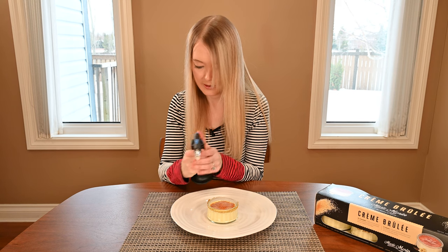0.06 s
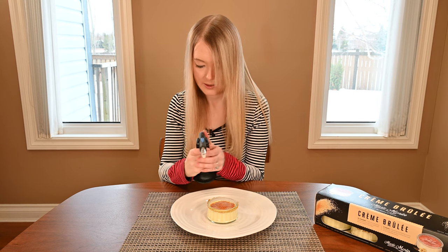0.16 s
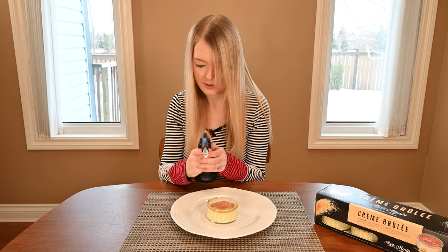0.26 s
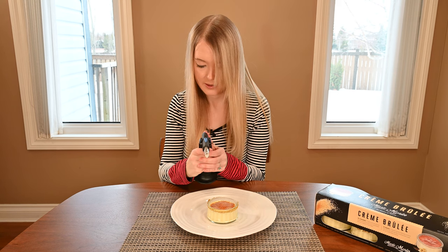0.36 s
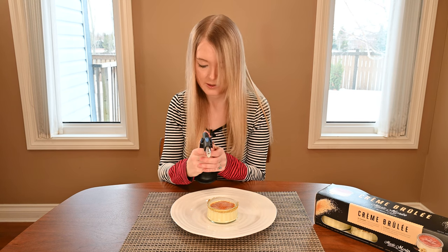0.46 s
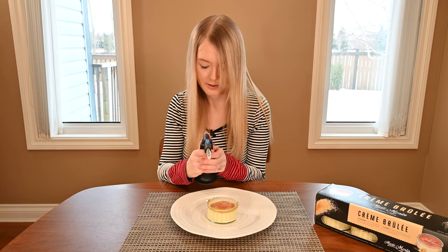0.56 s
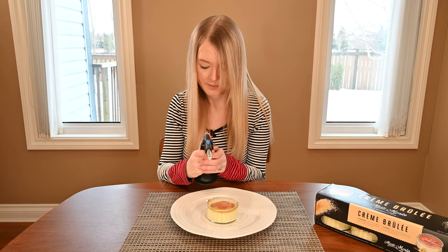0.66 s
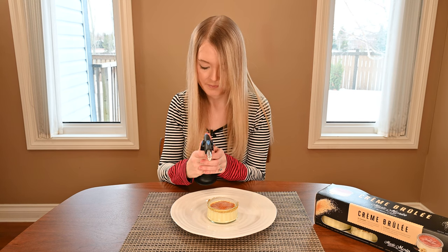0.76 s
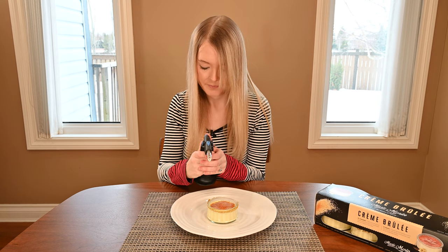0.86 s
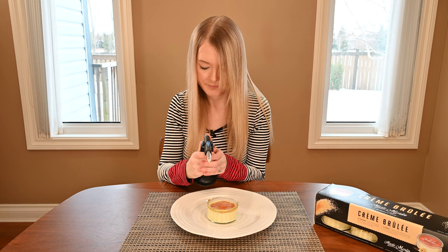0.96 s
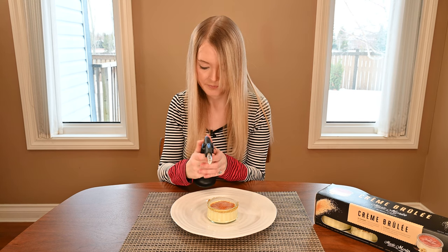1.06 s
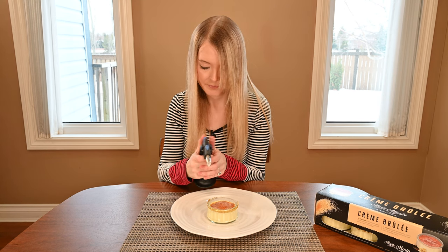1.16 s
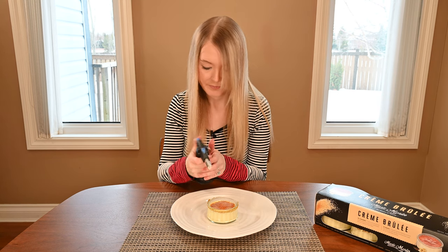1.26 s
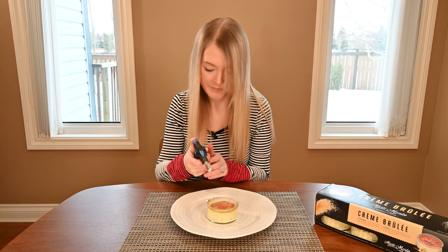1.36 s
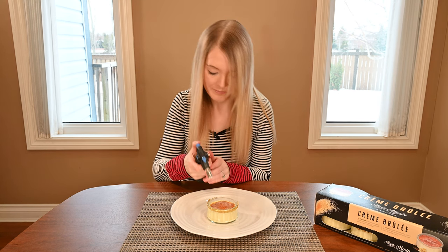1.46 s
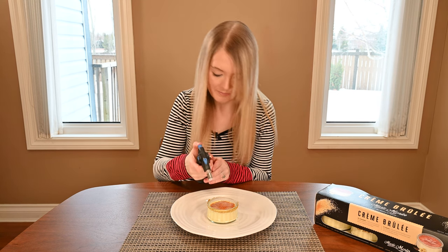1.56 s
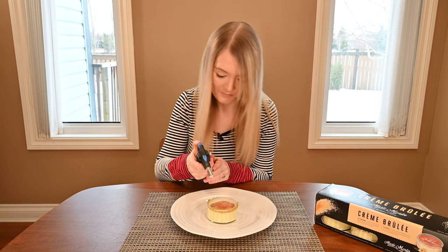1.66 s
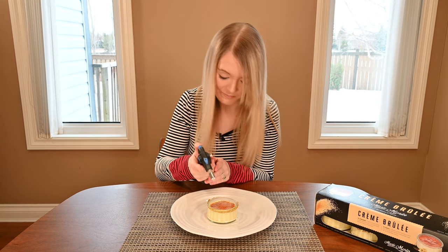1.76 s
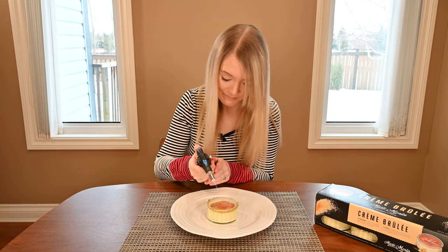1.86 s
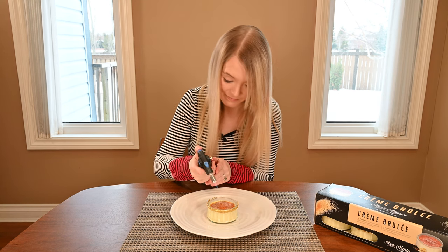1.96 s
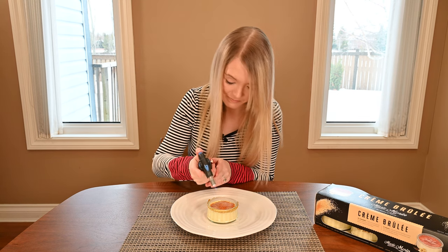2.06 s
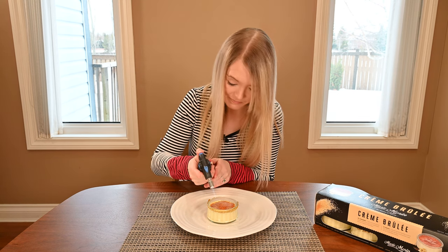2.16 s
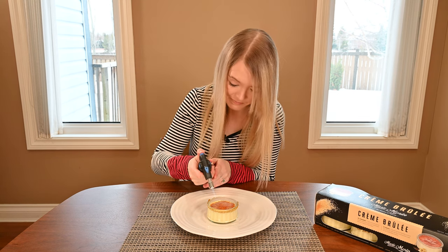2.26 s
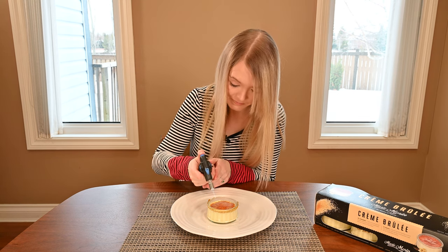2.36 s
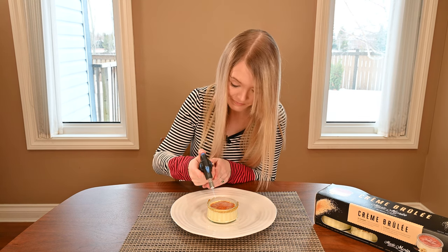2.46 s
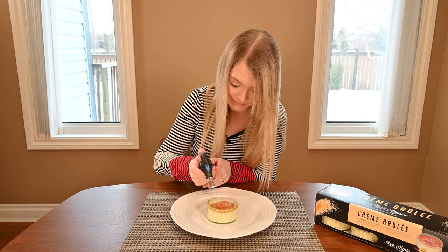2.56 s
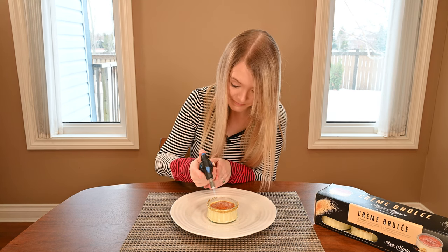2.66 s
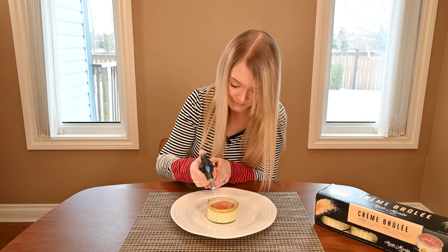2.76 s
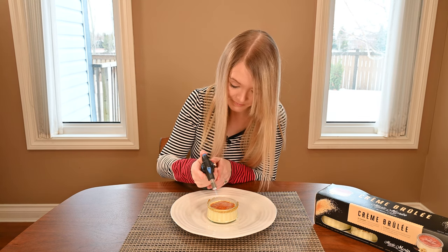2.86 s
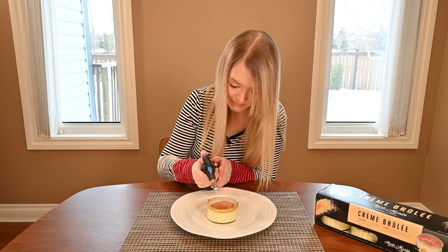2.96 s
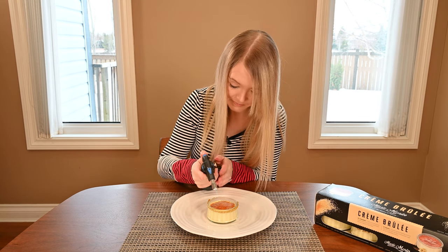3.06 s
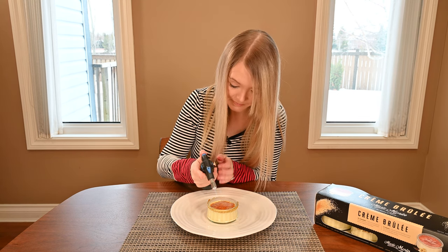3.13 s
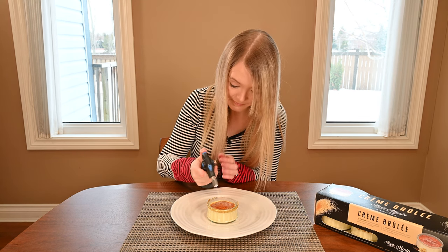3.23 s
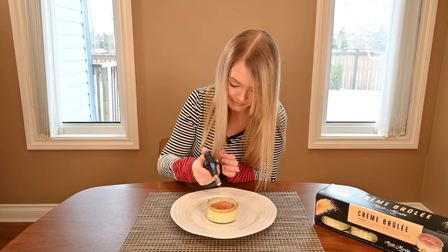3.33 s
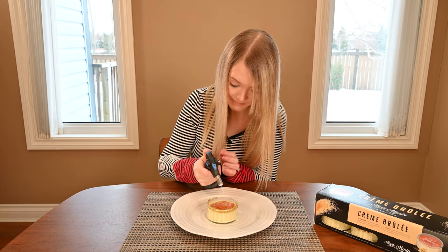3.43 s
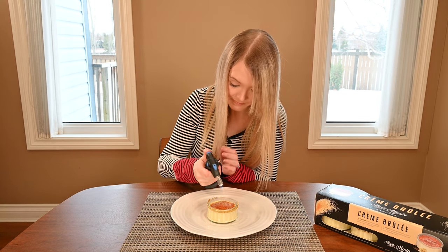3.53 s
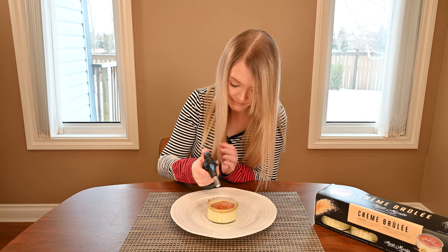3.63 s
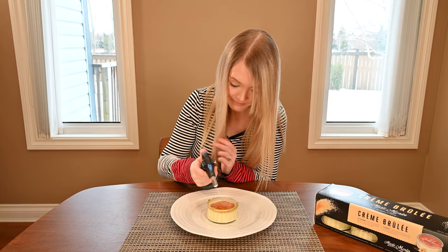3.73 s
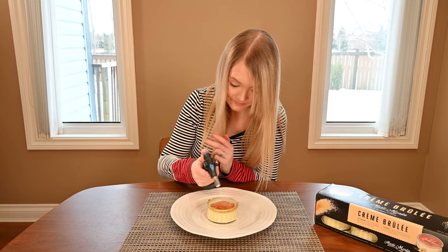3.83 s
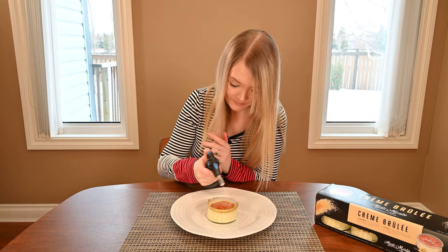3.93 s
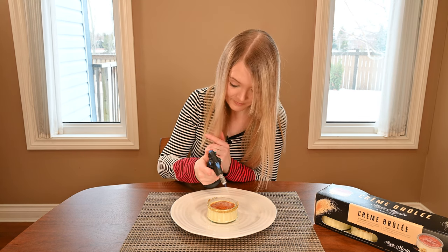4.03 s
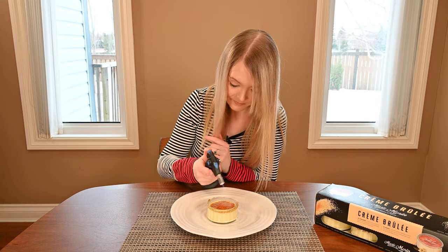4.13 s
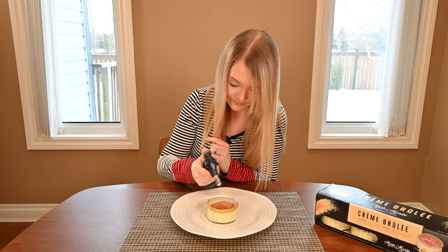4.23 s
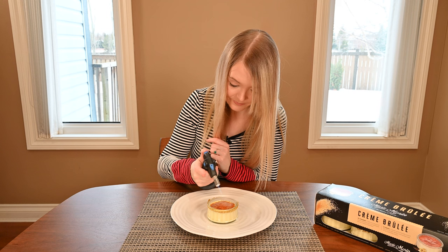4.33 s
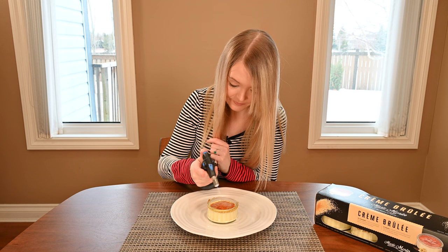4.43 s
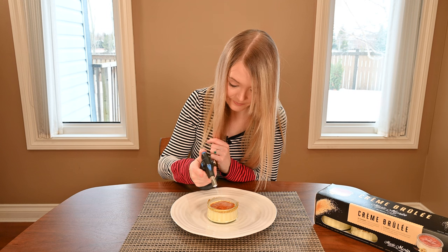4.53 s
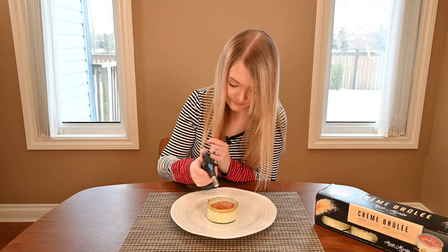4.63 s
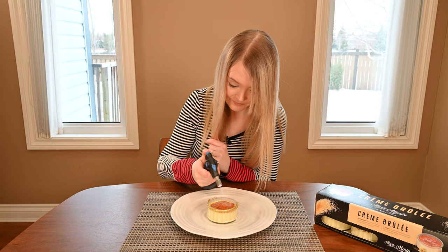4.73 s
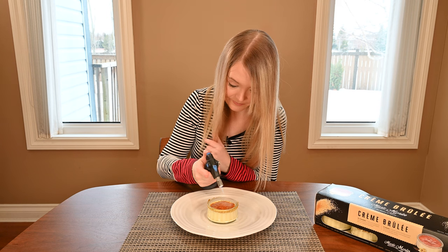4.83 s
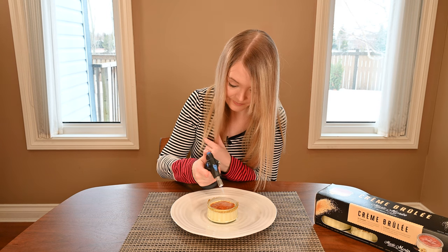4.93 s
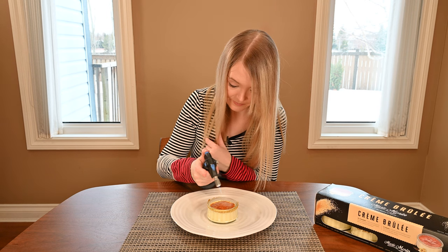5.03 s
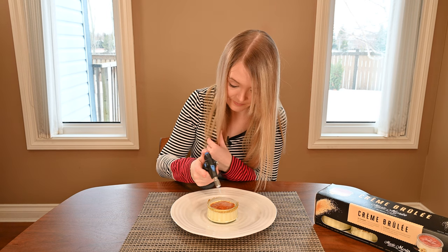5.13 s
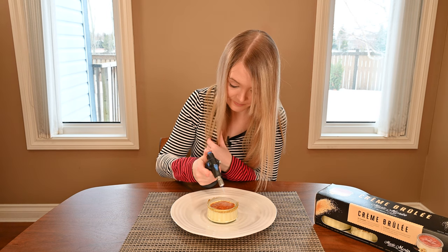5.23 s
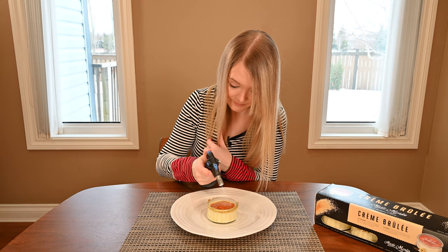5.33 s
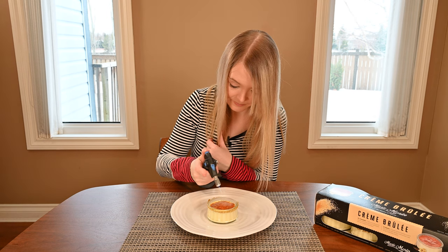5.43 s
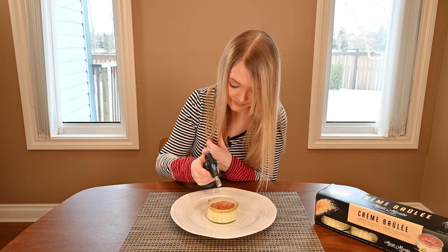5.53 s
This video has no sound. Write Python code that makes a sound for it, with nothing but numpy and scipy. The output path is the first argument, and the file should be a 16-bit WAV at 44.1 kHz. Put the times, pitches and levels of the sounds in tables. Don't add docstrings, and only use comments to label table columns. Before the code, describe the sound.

Soft sleeve and finger handling in a quiet room, then two sharp igniter snaps, a small pop, and a steady hissing gas torch with late sugar sizzle.

```python
import sys
import numpy as np
from scipy import signal
from scipy.io import wavfile
from scipy.ndimage import uniform_filter1d

SR = 44100
rng = np.random.default_rng(int(sys.argv[2]) if len(sys.argv) > 2 else 0)


def invert_db(x):
    u = np.asarray(x, float) / 20
    return 10 ** u


def wav_out(sig):
    wavfile.write(sys.argv[1], SR, np.round(np.clip(np.atleast_2d(sig).T, -1, 1) * 32767).astype(np.int16))


N = 246737
TIME = np.arange(N) / SR
HZ = np.fft.rfftfreq(1024, 1 / SR)[:, None]
FRAMES = np.arange(N // 256 + 5) * 256 / SR
LIGHT_S = 1.8838

# frequency in Hz, level in dB per Hz.
ROOM_HISS = [(20, -23.5), (50, -17.5), (120, -3.5), (300, -2.5), (600, -11), (1200, -16), (2500, -23),
             (6000, -24), (12000, -28), (13500, -31), (16000, -35)]
# frequency in Hz, level in dB.
APPLIANCE_TONES = [(118.4, -78.5), (242.2, -82), (387.6, -85.5), (511.4, -81.5), (597.5, -90)]
# middle in seconds, length in seconds, level in dB.
SLEEVE_RUBS = [
    (-.05, 0.2, -75),
    (.25, 0.61, -70.5),
    (.52, 0.12, -73.5),
    (1.1, 0.23, -77),
    (1.35, 0.38, -67),
    (1.6, .1, -74.5),
]
# frequency in Hz, level in dB.
CLOTH = [(250, -1), (800, 0.5), (1500, 0), (2600, -8.0), (6000, -18)]
# start in seconds, length in seconds, centre in Hz, width in Hz, level in dB.
FINGER_SLIPS = [(.14, .157, 1900, 700, -79), (.33, .06, 8500, 900, -88), (.316, .071, 2200, 2200, -79.5),
                (.35, .04, 1800, 300, -78), (1.03, .03, 6000, 8000, -82), (1.085, .1, 5000, 2200, -80),
                (1.21, .06, 1450, 450, -73), (1.2, .065, 5000, 5000, -76), (1.28, .07, 3520, 2500, -76),
                (1.34, .035, 7000, 8000, -74), (1.395, .095, 8750, 1000, -82),
                (1.385, .115, 6500, 8000, -74), (1.4, .025, 13500, 3000, -81),
                (1.575, .068, 1390, 500, -74), (1.574, .056, 3600, 2800, -78)]
# start in seconds, peak in dB, rise in ms, time to fall by 60 dB in seconds.
CLICKS = [(0.1245, -39.5, 3.9, 0.032), (.508, -60, .5, .008), (0.6476, -61, .5, .01), (.687, -64, .5, .008),
          (1.582, -61.5, .5, 0.037), (1.6746, -57, .5, .01), (1.7084, -27, .4, 0.0095),
          (1.7202, -40.5, .8, .015), (1.8286, -26, .8, 0.0043), (1.8394, -8.5, 0.87, 0.0063),
          (1.8726, -2.6, 0.18, 0.0115)]
STRUCK_PART = [0, 4, 5, 4, 5, 4, 1, 0, 3, 2, 3]
# frequency in Hz, width in Hz, level in dB.
PARTS = [
    [(1650, 390, 4.5), (3020, 240, 1.5), (4210, 390, -1), (4850, 220, 0), (6570, 900, -11), (8800, 470, -7),
     (12100, 2500, -18)],
    [(740, 540, -6.5), (1460, 500, -1), (2130, 150, -2), (3000, 510, 0.5), (3970, 1000, 3),
     (5870, 550, 1.5), (9500, 970, -4.5), (11600, 1800, -4.5), (14500, 1800, -12)],
    [(1890, 180, -21.5), (3430, 660, -11.5), (4840, 1330, -4.5), (5900, 1100, -7.5), (6800, 1300, -18),
     (8580, 770, -11.5), (12100, 1200, -18), (15200, 1100, -16)],
    [(1350, 180, -5), (2430, 510, -8.5), (3750, 510, -1), (5630, 450, -1.5), (8830, 600, 0),
     (10900, 1330, 0.5), (13040, 790, 0), (14730, 1100, -2.5)],
    [(4300, 2000, 13), (6300, 1200, 3), (9000, 1500, -13)],
    [(1500, 600, -5.5), (2720, 740, -2), (4500, 1200, -14), (7000, 2200, -9)],
]
PART_LOWEST_HZ = [650, 450, 1180, 320, 2500, 1210]
# frequency in Hz, level in dB, time to fall by 60 dB in seconds.
METAL_RING = [
    (1330, -15.5, .018),
    (3300, -19.5, .03),
]
# middle in seconds, length in seconds, level in dB.
ARM_SHIFTS = [
    (.32, 0.24, -69),
    (1.42, .15, -78),
    (4.9, 0.41, -63),
    (5.2, 0.35, -66),
]
# frequency in Hz, level in dB.
COLD_RUSH = [(300, -1), (700, 7.5), (1400, 7), (2500, -16), (5000, -29)]
# frequency in Hz, width in Hz, level in dB.
TUBE_MODES = [(1940, 150, -13.5), (2720, 370, -20.5), (4210, 470, -6), (4673, 584, 1), (6220, 1600, -5),
              (7890, 1130, 0), (9100, 3600, -10.5), (11000, 1950, 0.5), (13370, 1900, 1.5),
              (15170, 1400, -2.5)]
# time in seconds, level in dB.
GAS_FLOW = [
    (1.75, -60.5),
    (1.81, -56),
    (1.83, -57.5),
    (2.12, -57),
    (2.47, -57),
    (4.1, -58),
    (4.9, -57.5),
    (5.03, -54),
    (5.14, -55),
    (5.59, -54),
]
# middle in seconds, length in seconds, lift in dB.
TUBE_SWINGS = [
    (2.47, .2, 5),
    (4.056, 0.27, 1.5),
    (4.93, 0.19, 4.5),
    (5.174, 0.21, 4),
]
# time in seconds, frequency in Hz, depth from 0 to 1.
PLATE_SHADOW = [(1.9, 11000, .25), (2.1, 11200, .4), (2.27, 13400, .4), (2.45, 14500, .4),
                (3.1, 14300, .38), (3.8, 15300, .45), (4.1, 13100, .25), (4.5, 12800, .3), (5.6, 14300, .2)]
HAND_TREMOR = [
    (1.7, .012),
    (3.1, .009),
    (5.3, .006),
]
# frequency in Hz, level in dB per Hz.
FLAME_ROAR = [(40, -38), (70, -48), (118, -15.5), (210, -7.5), (300, -2.5), (450, -3.5), (750, -3),
              (900, -6), (1400, -8.5), (1660, -19.5), (2200, -24.5), (3500, -30.5), (6000, -47)]
# frequency in Hz, width in Hz, lift in dB.
ROOM_MODES = [(246.5, 62, 0), (429.3, 15, 5), (568, 33, 7), (700, 32, 4), (715, 20, 6)]
# middle in seconds, length in seconds, lift in dB.
FLAME_LICKS = [
    (2.304, 0.26, 1),
    (3.29, 0.35, 0.3),
    (5.282, 0.052, 4),
    (5.6, .03, 3),
]
# start in seconds, peak in dB.
SUGAR_SPITS = [(4.2098, -48), (4.6194, -44), (4.636, -47.5), (4.6544, -57), (4.6794, -46), (4.6916, -50),
               (4.7561, -39), (4.791, -43), (4.8094, -54), (4.9643, -45), (4.9757, -41), (5.008, -43),
               (5.0344, -49), (5.2644, -46), (5.309, -50)]
# start in seconds, peak in dB, centre in Hz, time to fall by 60 dB in seconds.
SYRUP_BUBBLES = [
    (4.896, -47, 2000, 0.056),
    (4.915, -54, 2100, .04),
    (5.02, -46, 3000, 0.031),
    (5.265, -54, 2800, .03),
]
# middle in seconds, length in seconds, level in dB.
SIZZLE_SPELLS = [
    (4.22, .06, -68),
    (4.65, 0.17, -60),
    (4.79, 0.22, -63),
    (4.98, 0.25, -67),
    (5.28, .15, -72),
    (5.55, .2, -74),
]
# delay in ms, level in dB.
ECHOES = [
    (7.8, -23),
    (9.3, -25.5),
    (12.6, -27),
    (19.3, -21.5),
    (26, -25.5),
]
# frequency in Hz, time to fall by 60 dB in seconds.
ROOM_DECAY = [(125, 0.51), (500, 0.55), (2000, 0.75), (6000, 0.45), (15000, 0.34)]
# frequency in Hz, level in dB against the sound.
TRACK_DIFFERENCE = [(60, -48), (1200, -57), (2400, -33.5), (4400, -20.5), (8000, -18), (15000, -8.5)]


def evened(x):
    return x / np.sqrt(np.mean(x ** 2) + 1e-20)


def read(points, hz):
    f, value = np.transpose(points)
    return np.interp(np.log(hz + 1), np.log(f + 1), value)


def add(mix, s, sound):
    part = mix[round(s * SR):][:len(sound)]
    part += sound[:len(part)]


def resonate(x, hz, width):
    pole = np.exp((2j * np.pi * hz - np.pi * width) / SR)
    return 2 * signal.lfilter([1 - abs(pole)], [1, -pole], x).real


def peak(hz, width):
    return 1 / (1 + (2 * (HZ - hz) / width) ** 2)


def bump(t, middle, length):
    return np.exp(-(2 * (t - middle) / length) ** 2)


def spells(rows):
    return sum(invert_db(db) * bump(TIME, s, length) ** 2 for s, length, db in rows)


def wander(seconds):
    size = max(int(seconds * SR), 2)
    drift = uniform_filter1d(rng.standard_normal(N), size)
    return evened(uniform_filter1d(drift, size))


def noise(magnitude, patchy_db, frames=8):
    a, b, patches = rng.standard_normal((len(FRAMES), len(HZ), 3)).T
    patches = uniform_filter1d(patches, size=10, axis=0)
    patches = evened(uniform_filter1d(patches, frames, axis=1))
    z = (a + 1j * b) * magnitude * invert_db(patchy_db * patches)
    return signal.istft(z, nperseg=1024, noverlap=768)[1][:N]


def background():
    hiss = invert_db(-72) * evened(noise(invert_db(read(ROOM_HISS, HZ)), patchy_db=0.9))
    sway = wander(0.041)
    hum = np.zeros(N)
    for k, (hz, db) in enumerate(APPLIANCE_TONES, 1):
        level = invert_db(db + 3 + 1.1 * np.roll(sway, 9000 * k))
        hum += level * np.sin(2 * np.pi * hz * TIME + 0.2 * np.roll(sway, -7000 * k))
    return hiss + hum


def hands():
    out = spells(SLEEVE_RUBS) * evened(noise(invert_db(read(CLOTH, HZ)), patchy_db=3.5))
    out = out * np.clip((1.72 - TIME) / 0.027, 0, 1)
    grain = rng.standard_normal(N) * invert_db(4.7 * wander(0.0042))
    for start, length, hz, width, db in FINGER_SLIPS:
        slip = grain[round(start * SR):][:round(length * SR)]
        slip = resonate(resonate(slip, hz, width), hz, width)
        add(out, start, invert_db(db) * evened(slip) * signal.windows.tukey(len(slip), 0.55))
    return out


def through(knock, part, blur=1):
    sound = invert_db(-14) * evened(knock)
    for k, (hz, width, db) in enumerate(PARTS[part]):
        sound = sound + (-1) ** k * invert_db(db) * evened(resonate(knock, hz, blur * width))
    return signal.lfilter(*signal.butter(5, PART_LOWEST_HZ[part], "high", fs=SR), sound)


def clicks():
    out, around, t = np.zeros(N), np.zeros(N), TIME[:2000]
    rattles = rng.choice([-1., 1.], (len(CLICKS), len(t)))
    for (s, db, rise_ms, t60), part, rattle in zip(CLICKS, STRUCK_PART, rattles):
        knock = rattle * np.clip(1000 * t / rise_ms, 0, 1) ** 2 * invert_db(-60 * t / t60)
        click = through(knock, part)
        click = invert_db(db) * click / abs(click).max()
        add(out, s, click)
        spread = through(1. * (t == 0), part, blur=2.1)
        add(around, s, evened(spread) * np.std(click))
    ring = sum(invert_db(db - 60 * t / t60) * np.sin(2 * np.pi * hz * t) for hz, db, t60 in METAL_RING)
    strike_s = CLICKS[-1][0]
    add(out, strike_s, ring * np.clip(t / 0.00057, 0, 1))
    add(around, strike_s, 0.35 * ring)
    return out, around


def table():
    return spells(ARM_SHIFTS) * evened(noise(peak(161, 130) ** 2, patchy_db=1.0))


def cold_gas():
    colour = invert_db(read(COLD_RUSH, HZ)) + 0.7 * peak(6100, 700)
    flowing = np.clip((TIME - 1.712) / 0.011, 0, 1) * (TIME < LIGHT_S)
    return flowing * invert_db(-64) * evened(noise(colour, patchy_db=-4.0))


def jet():
    swing_db = sum(db * bump(FRAMES, s, length) for s, length, db in TUBE_SWINGS)
    cold = FRAMES < LIGHT_S
    middle_db = -11 + swing_db * (0.3 + 0.88 * peak(7860, 1500))
    top_db = -10.5 + 0.24 * swing_db - 4.5 * cold
    power = [(invert_db(db) * peak(hz, width)) ** 2 for hz, width, db in TUBE_MODES]
    low, middle, top = (sum(part) / np.sum(part) for part in (power[:4], power[4:6], power[6:]))
    tube = np.sqrt(low + invert_db(2 * middle_db) * middle + invert_db(2 * top_db) * top)
    s, hz, depth = np.transpose(PLATE_SHADOW)
    hz, depth = np.interp(FRAMES, s, hz), np.interp(FRAMES, s, depth)
    hz = hz * (1 + sum(share * np.sin(2 * np.pi * rate * FRAMES) for rate, share in HAND_TREMOR))
    detour_cycles = 6.5
    reflection = depth * np.minimum(HZ / 13500, 1) ** 3.5 * np.exp(2j * np.pi * detour_cycles * HZ / hz)
    tube = tube * abs(1 + reflection)
    tube = tube * (1 - 0.55 * bump(FRAMES, 3.58, 0.55) * peak(11000, 3200))
    tube = tube * (1 - 0.63 * cold * (peak(7750, 1500) + peak(2300, 1500)))
    gas = evened(noise(tube, patchy_db=0.47, frames=40))
    valve = np.clip((TIME - 1.735) / 0.02, 0, 1)
    flow_db = np.interp(TIME, *np.transpose(GAS_FLOW)) + 0.3 + 0.6 * wander(0.0031)
    return valve * invert_db(flow_db) * gas


def flame():
    age = np.maximum(TIME - LIGHT_S, 0)
    pop_db, pop_top_hz, pop_t60 = -41, 450, 0.12
    puff = signal.lfilter(*signal.butter(2, [90, pop_top_hz], "band", fs=SR), rng.standard_normal(N))
    puff = evened(puff) * invert_db(pop_db - 60 * age / pop_t60) * np.clip(age / 0.0012, 0, 1)
    push_db, push_s = -34, 0.0006
    u = age / push_s
    push = invert_db(push_db) * u * (2 - u) * np.exp(-u) * 2
    colour_db = read(FLAME_ROAR, HZ) + sum(db * peak(hz, width) for hz, width, db in ROOM_MODES)
    roar = evened(noise(invert_db(colour_db), patchy_db=0.13))
    level_db = -51.5 + 0.94 * wander(0.0093) - 0.08 * wander(0.063)
    level_db = level_db + sum(db * bump(TIME, s, length) for s, length, db in FLAME_LICKS)
    return np.clip(age / 0.035, 0, 1) * invert_db(level_db) * roar + puff + push


def sugar():
    out, t = np.zeros(N), TIME[:2000]
    spit_hz, spit_t60 = 11000, 0.038
    bursts = [(*row, spit_hz, spit_t60) for row in SUGAR_SPITS] + SYRUP_BUBBLES
    puffs = rng.standard_normal((len(bursts), len(t)))
    for (s, db, hz, t60), puff in zip(bursts, puffs):
        colour = evened(resonate(puff, hz, 0.4 * hz)) + 0.51 * puff
        burst = colour * invert_db(-60 * t / t60) * np.clip(t / 0.0011, 0, 1)
        add(out, s - 0.001, invert_db(db) * burst / abs(burst).max())
    return out


def sizzle():
    grains = (rng.random(N) < 900 / SR) * invert_db(3.7 * np.minimum(rng.exponential(1, N), 4))
    fade = invert_db(-60 * TIME[:300] / 0.006)
    puffs = signal.oaconvolve(grains, fade)[:N] * rng.standard_normal(N)
    bright = resonate(puffs, 11000, 3500) + 0.74 * resonate(puffs, 2800, 1500)
    return spells(SIZZLE_SPELLS) * evened(bright)


def room(x, around, tail_db):
    taps, echoes = np.zeros(SR // 2), np.zeros(SR // 2)
    at = np.arange(130, len(taps) - 10, 10)
    taps[at + rng.integers(0, 10, len(at))] = rng.choice([-1., 1.], len(at))
    hz, t, z = signal.stft(taps, SR, nperseg=256)
    tail = signal.istft(z * invert_db(-60 * t / read(ROOM_DECAY, hz)[:, None]), SR, nperseg=256)[1]
    tail = invert_db(tail_db) * tail / np.linalg.norm(tail)
    for ms, db in [(0, 0)] + ECHOES:
        add(echoes, ms / 1000, invert_db([db]))
    return signal.fftconvolve(x, echoes)[:N] + signal.fftconvolve(around, tail)[:N]


def scene():
    burning = sugar() + sizzle() + jet() + flame()
    near = room(*clicks(), tail_db=-14.0) + room(burning, burning, tail_db=-11.5)
    near = signal.lfilter(*signal.butter(2, 70, "high", fs=SR), near)
    return np.tile(near + cold_gas() + hands() + background() + table(), (2, 1))


def gate(x):
    hz, _, z = signal.stft(x, SR, nperseg=2048)
    bands = (abs(z[0, :1024]) ** 2).reshape(32, 32, -1).mean(axis=1)
    faint = np.repeat(bands < invert_db(2 * -116.3), 32, axis=0)
    faint = np.vstack([faint, faint[-1:]])
    keep = 1 - faint * (hz > 12900)[:, None]
    return signal.istft(z * keep, SR, nperseg=2048)[1][:, :N]


def roll_off(x):
    return signal.sosfilt(signal.butter(12, 17150, fs=SR, output="sos"), x)


def record(dry):
    hz, _, z = signal.stft(dry[0], SR, nperseg=256)
    grain = z * np.exp(2j * np.pi * rng.random(z.T.shape).T) * invert_db(read(TRACK_DIFFERENCE, hz))[:, None]
    side = signal.istft(grain, SR, nperseg=256)[1][:N]
    hiss = signal.lfilter(*signal.butter(4, [2500, 12800], "band", fs=SR), rng.standard_normal(N))
    side = side + invert_db(-89.5) * hiss
    edge = signal.firwin(1023, 15800, window=("kaiser", 9), fs=SR)
    mix = signal.oaconvolve(gate(dry + [side, -side]), edge[None], "same")
    return roll_off(mix)


dry = scene()
out = record(dry)
wav_out(out)
```